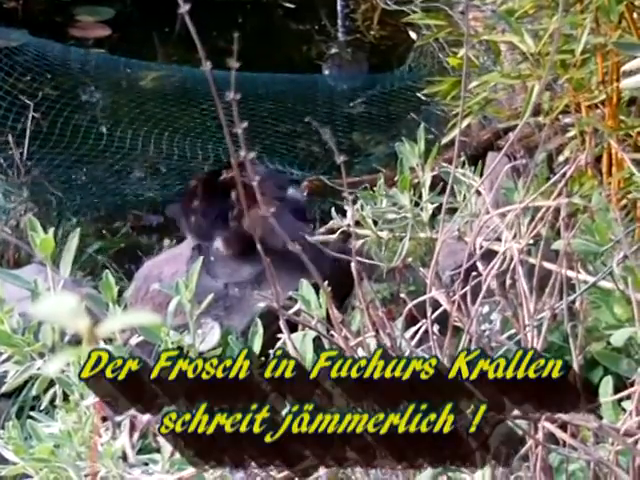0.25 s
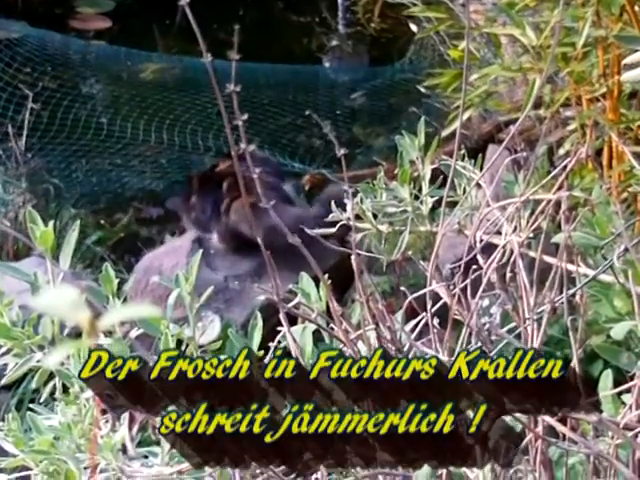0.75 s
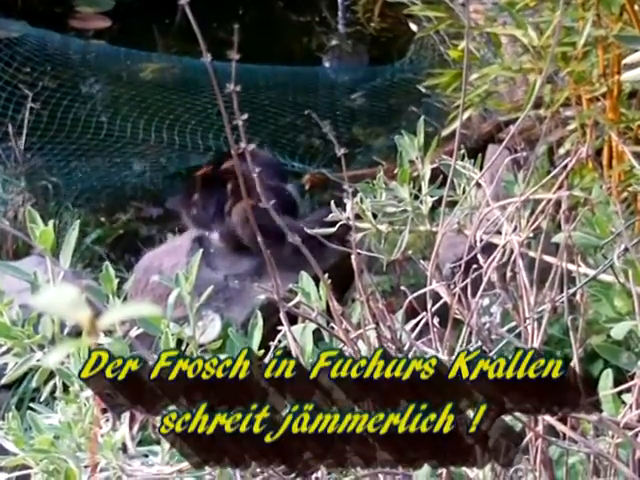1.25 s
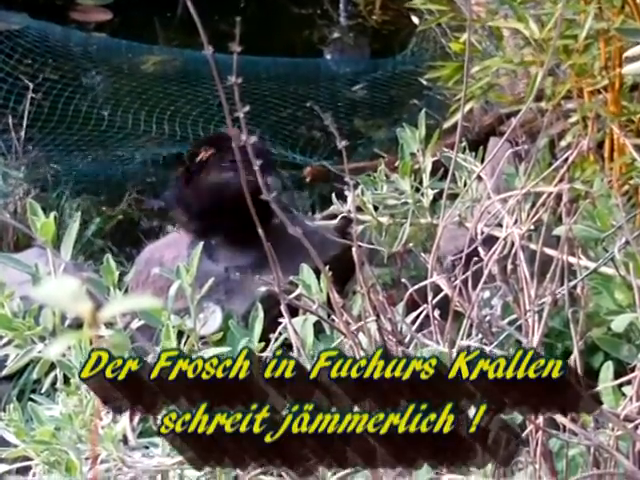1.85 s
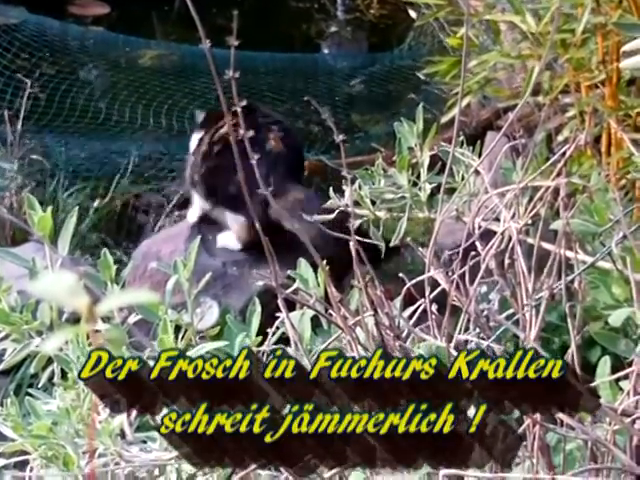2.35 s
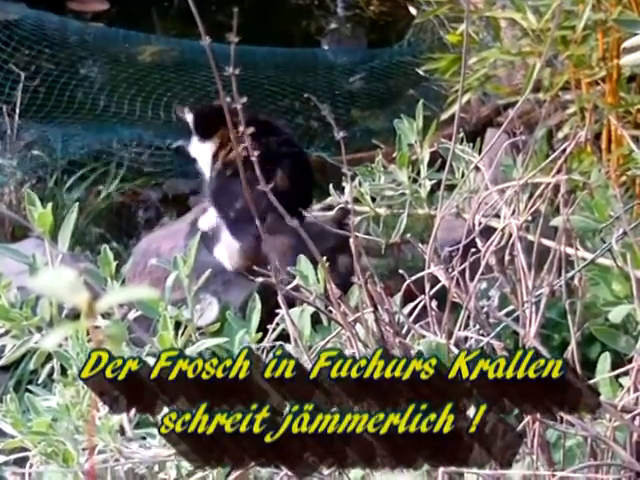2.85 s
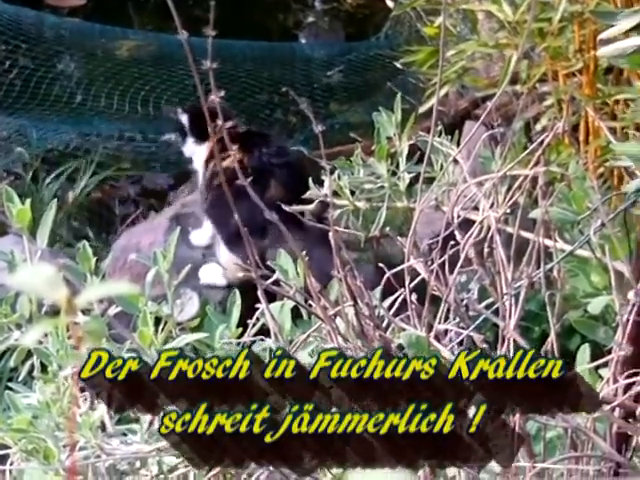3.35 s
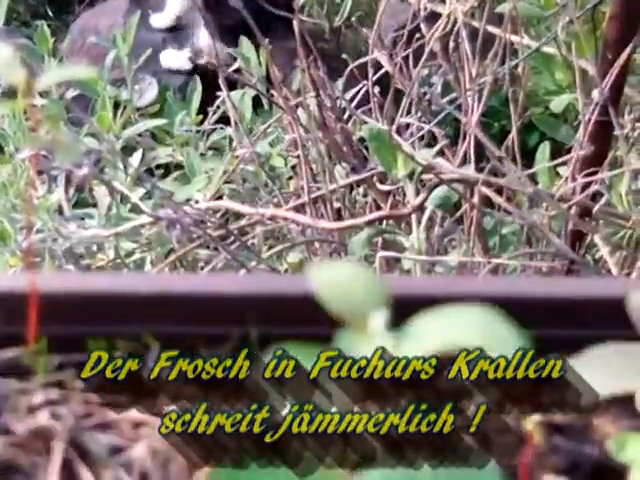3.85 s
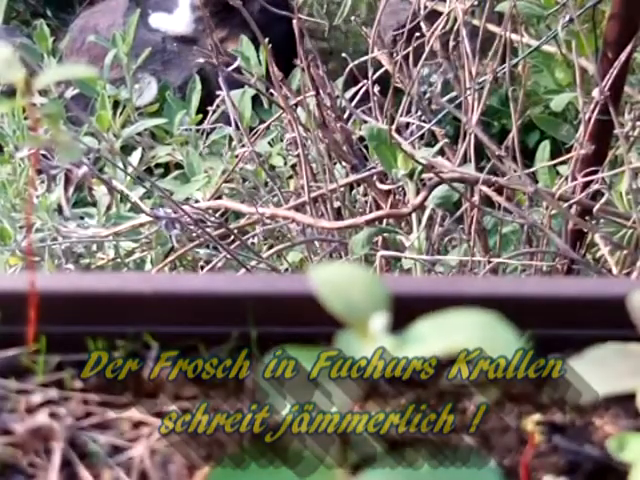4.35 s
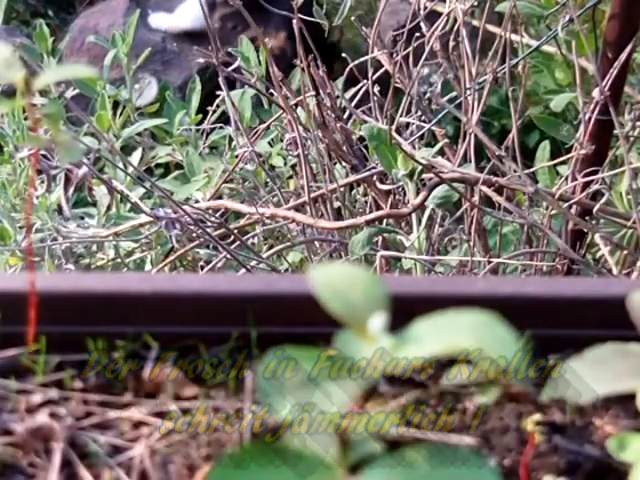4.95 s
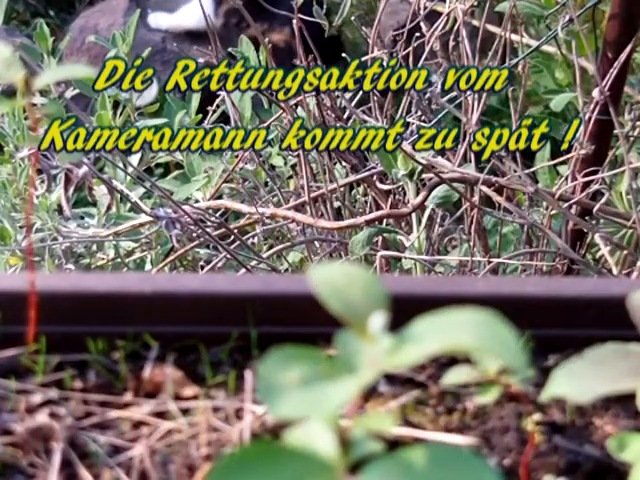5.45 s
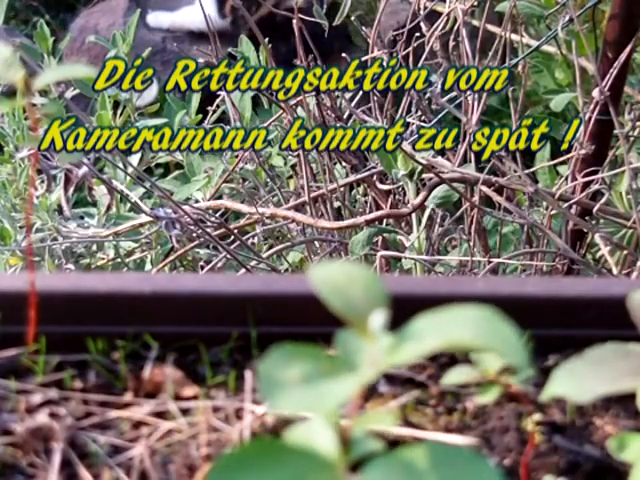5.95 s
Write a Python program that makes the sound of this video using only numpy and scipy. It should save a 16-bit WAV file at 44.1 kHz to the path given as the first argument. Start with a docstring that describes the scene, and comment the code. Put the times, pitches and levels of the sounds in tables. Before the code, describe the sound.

A very quiet garden opens with faint, thin bird chirps and light ticks of dry stems. At about 1.4 seconds the soft outdoor hush and leaf hiss grow louder, and the chirps become clearer. A stalk breaks with a sharp crack at 1.7 seconds, followed by dry rustling. A frog held by a cat screams five times, at about 2.8, 3.5, 4.6, 5.4 and 6 seconds. Each scream is a shrill, slightly raspy wail under half a second long, opening with a high squeak and falling in pitch; the second is weaker. From 3.2 seconds, irregular dull, hollow knocks sound close by, loudest around 5.2 to 5.4 seconds and continuing until the end just after 6 seconds. More twigs snap and leaves rustle between 4 and 6 seconds, with occasional chirps. Faint wind rumbles on the microphone. Screams, chirps and snaps carry a short echo.

```python
"""A quiet garden: dry stalks rustle and snap, and thin chirps, probably a small bird's, come and go.
At about 1.4 seconds the soft outdoor hush grows louder, and a stalk soon breaks with a sharp crack.
From 2.8 seconds a frog held by a cat screams five times: shrill, falling wails from its vocal cords,
whose loudest overtone follows its open mouth. Dull, hollow knocks sound close by after the first scream
and go on to the end. The garden answers the screams, chirps and snaps with a short echo."""
import sys
import numpy as np
from scipy import signal
from scipy.fft import rfft, irfft, next_fast_len
from scipy.io import wavfile
from scipy.ndimage import map_coordinates

SR = 44100
rng = np.random.default_rng(int(sys.argv[2]) if len(sys.argv) > 2 else 0)


def waveform_to_disk(signal):
    """Save audio, clipped to [-1, 1], as 16-bit WAV at the path in sys.argv[1]."""
    frames = np.transpose(np.atleast_2d(signal))
    scaled = np.clip(frames, -1, 1) * 32767
    samples = np.round(scaled).astype(np.int16)
    wavfile.write(sys.argv[1], SR, samples)


N = 273420  # 6.2 seconds
TOP_HZ = 16050  # the highest frequency heard


def amp(db):
    """Turn decibels into a factor to multiply by."""
    return 10 ** (np.asarray(db) / 20)


def unit(x):
    """Scale x to an average (rms) size of 1."""
    return x / np.sqrt(np.mean(x ** 2) + 1e-20)


def along(points, hz):
    """Read between (Hz, value) points on a log frequency axis."""
    freqs, values = np.transpose(points)
    return np.interp(np.log(hz + 1), np.log(freqs + 1), values)


def curves(rows):
    """Give the start time, then each further column as a curve with one value per sample."""
    times, *columns = np.transpose(rows)
    t = np.arange(times[0], times[-1], 1 / SR)
    return [times[0]] + [np.interp(t, times, column) for column in columns]


def wobble(rate, size):
    """A smooth curve through `rate` random values a second."""
    return map_coordinates(rng.standard_normal(int(size * rate / SR) + 4), [np.arange(size) * rate / SR])


def fade(x, seconds):
    """Soften both ends of x."""
    i = np.arange(len(x))
    return x * np.clip(np.minimum(i, i[::-1]) / (seconds * SR), 0, 1)


def add(out, start, x):
    """Mix x into out from `start` seconds on."""
    i = max(round(start * SR), 0)
    out[i:i + len(x)] += x[:max(len(out) - i, 0)]


def filtered(x, response):
    """Scale each frequency f in x by response(f)."""
    size = next_fast_len(len(x) + 8192)
    return irfft(rfft(x, size) * response(np.fft.rfftfreq(size, 1 / SR)), size)[:len(x)]


def resonance(f, hz, width):
    """A filter response that is 1 at hz and weaker on both sides."""
    return 1j * f * width / (hz * hz - f * f + 1j * f * width)


def noise(response, size):
    """Filtered noise with an average size of 1."""
    return unit(filtered(rng.standard_normal(size), response))


def air_level(quiet_db, loud_db, step_at=1.372, step_s=0.008, creep_s=0.45, creep_db=5.5):
    """A background level in dB: it starts quiet, jumps once, then creeps up the last bit."""
    times = step_at + np.array([0, step_s, step_s + creep_s])
    return np.interp(np.arange(N) / SR, times, [quiet_db, loud_db - creep_db, loud_db])


# The tone of the outdoor air. Each row: frequency in Hz, relative level in dB.
HUSH_TONE = [(20, -8), (60, -0.5), (120, -10.5), (185, 0), (240, -2.5), (450, 1.5), (1000, -1.5),
             (1700, -5.5), (3200, -7.5), (5000, -11), (7000, -36), (11000, -90)]

def hush():
    """A low outdoor hush that wavers slightly."""
    air = noise(lambda f: amp(along(HUSH_TONE, f)) * f / (f + 90), N)
    return air * amp(air_level(-64.5, -48) + 0.95 * wobble(15, N))


# Puffs of wind on the microphone. Each row: time of the peak in seconds, relative level in dB.
WIND_PUFFS = [(.56, -63), (2.68, -63), (2.9, -56.5), (3.42, -54), (4.73, -58), (5.32, -61), (6.13, -54.5)]

def wind(gain_db=-2, puff_s=0.084):
    """A faint, deep rumble of wind that swells with each puff."""
    t = np.arange(N) / SR
    breeze = amp(air_level(-83, -66.5))
    puffs = sum(amp(db) * np.exp(-((t - peak) / puff_s) ** 2) for peak, db in WIND_PUFFS)
    return amp(gain_db) * (breeze + puffs) * noise(lambda f: resonance(f, hz=64, width=55), N)


# The tone of the foliage. Each row: frequency in Hz, relative level in dB.
FOLIAGE_TONE = [(1470, -18.5), (2500, -22), (3130, -19), (3830, -3), (7830, -1.5), (12000, -1.5),
                (15200, -2.5), (16000, -26)]

def foliage():
    """Many leaves blend into a soft, high hiss."""
    hiss = noise(lambda f: amp(along(FOLIAGE_TONE, f)), N)
    return hiss * amp(air_level(-65.5, -49) + 0.9 * wobble(15, N))


# The tone of dry leaves and stems. Each row: frequency in Hz, relative level in dB.
DRY_PLANT_TONE = [(410, -10), (700, -4.5), (1020, -7.5), (1350, -0.5), (1540, -4), (1710, -4.5), (2100, -2),
                  (7110, -1.5), (7690, -2.5), (11500, -2.5), (16000, -15)]

def dry_plant_noise():
    """The steady noise that ticks and rustles are shaped from."""
    return noise(lambda f: amp(along(DRY_PLANT_TONE, f)), N)


def stem_ticks(per_second=70, decay_s=0.0011):
    """Dry stems touch at random, each time with a tiny tick."""
    touches = (rng.random(N) < per_second / SR) * rng.random(N)
    bursts = signal.lfilter([1], [1, -np.exp(-1 / (decay_s * SR))], touches)
    return amp(air_level(-75.5, -59)) * unit(bursts * dry_plant_noise())


# Brushes against dry plants. Each row: time of the peak in seconds, level in dB,
# rise time in seconds, fall time in seconds.
BRUSHES = [(.2, -56.5, 0.21, 0.11), (1.33, -54.5, 0.43, 0.12), (1.611, -35.5, 0.037, 0.11),
           (1.662, -28.5, 0.007, .09), (1.778, -37.5, 0.058, 0.29), (2.3, -44, 0.21, 0.2),
           (3.21, -41.5, 0.0071, 0.21), (4.04, -40.5, 0.019, 0.17), (4.149, -34, 0.055, 0.13),
           (4.208, -27, 0.063, 0.095), (5.16, -37, 0.04, 0.027), (5.78, -39.5, .06, 0.09),
           (5.823, -28.5, 0.014, 0.084), (6.19, -36, 0.12, .2)]

def rustle(swell_db=19, clump_db=3):
    """Leaves rub in clumps of crackles; each brush gains swell_db in its rise and loses it in its fall."""
    t = np.arange(N) / SR
    power = sum(amp(db - swell_db * np.maximum((peak - t) / rise, (t - peak) / fall)) ** 2
                for peak, db, rise, fall in BRUSHES)
    crackle = unit(dry_plant_noise() * amp(clump_db * wobble(700, N)))
    return np.sqrt(power) * crackle


# Breaking stalks and twigs. Each row: start in seconds, level in dB, centre frequency in Hz,
# width of the band in Hz, seconds for the splintering to fade by 60 dB.
STALK_BREAKS = [(0.03, -47, 5900, 8000, 0.12), (0.105, -48, 5030, 8000, .12),
                (1.268, -48.5, 7000, 6000, 0.1), (1.604, -29, 9550, 6000, 0.025),
                (1.6609, -8.5, 10400, 5960, 0.0067), (1.66, -23.5, 11000, 6900, 0.22),
                (1.771, -34, 8000, 8000, 0.018), (2.523, -31, 8160, 9000, 0.091),
                (3.203, -25.5, 8900, 8000, 0.052), (3.332, -38, 6000, 12000, .02),
                (3.477, -32.5, 1500, 400, .025), (3.9913, -18.5, 3660, 2480, 0.017),
                (3.9941, -14, 2790, 1190, 0.018), (4.087, -26.5, 1340, 900, 0.025),
                (4.613, -19, 4370, 7100, 0.011), (4.743, -17, 2200, 1013, 0.015),
                (4.917, -27, 1880, 900, 0.009), (5.136, -30, 1590, 1200, 0.017)]

def snaps(crack_db=3):
    """A breaking stalk gives one sharp crack and a short splintering around the same frequency."""
    out, t = np.zeros(N), np.arange(SR // 4) / SR
    for start, db, hz, width, fade_s in STALK_BREAKS:
        crack = amp(crack_db) * np.sin(2 * np.pi * hz * t) * np.exp(-width * t)
        splinters = amp(-60 * t / fade_s) * noise(lambda f: resonance(f, hz, width), len(t))
        add(out, start, amp(db) * (crack + splinters))
    # thin stalks give off no bass
    return signal.sosfilt(signal.butter(2, 800, "high", fs=SR, output="sos"), out)


# The notes at which the knocked thing rings. Each row: frequency in Hz, width in Hz, relative level in dB.
HOLLOW_NOTES = [(167, 12, 5.5), (313, 28, 4), (414, 43, 5), (520, 41, -16), (760, 52, -1), (1000, 51, 0)]

def hollow_body(f, blow_hz, ring_db=-3, dull_hz=1350):
    """A hollow body favours its own notes and those near the blow's pitch, and muffles the treble."""
    ringing = sum(amp(db) * np.abs(resonance(f, hz, width)) for hz, width, db in HOLLOW_NOTES)
    near_blow = np.abs(resonance(f, 1.06 * blow_hz, 1.87 * blow_hz))
    return (1 + amp(ring_db) * ringing) * near_blow / np.sqrt(1 + (f / dull_hz) ** 6)


# Dull knocks close by. Each row: start in seconds, level of the blow in dB, pitch in Hz,
# relative level of the rattle after it in dB.
BLOWS = [(3.24, -32.5, 450, -48.5), (4.036, -41, 730, -42), (4.209, -28.5, 410, -53),
         (4.555, -21.5, 650, -39.5), (4.583, -23, 600, -42), (4.852, -18.5, 615, -36),
         (5.2014, -12.5, 1000, -31.5), (5.2372, -12, 554, -27.5), (5.4, -10, 960, -24.5),
         (5.637, -25.5, 1000, -31), (5.675, -25.5, 428, -52), (5.756, -19.5, 530, -33),
         (5.8146, -18.5, 1270, -28.5), (6.087, -22, 1150, -33.5), (6.122, -34, 550, -32),
         (6.144, -23, 710, -38.5)]

def knocks(click_db=-19, grit_db=-13, bounce_db=2.5, rattle_gain_db=-0.5, hold_s=0.026, fade_s=0.24):
    """Each blow clicks and swings for a cycle or two; the hollow body rattles briefly, then dies away."""
    out, t = np.zeros(N), np.arange(SR // 3) / SR
    grit = lambda f: resonance(f, hz=2700, width=1800)
    for start, db, hz, rattle_db in BLOWS:
        cycles = hz * t
        swing = np.sin(2 * np.pi * cycles) * cycles ** 0.51 * np.exp(-1.6 * cycles / 0.97)
        click = amp(click_db) * noise(grit, len(t)) * np.exp(-t / 0.0045)
        blow = swing / np.abs(swing).max() + click
        rattle = noise(lambda f: hollow_body(f, hz), len(t)) + amp(grit_db) * noise(grit, len(t))
        bounces = unit(rattle * amp(bounce_db * wobble(140, len(t)))) * np.std(rattle)
        envelope = amp(-60 * np.maximum(t - hold_s, 0) / fade_s) * (1 - np.exp(-t / 0.00016))
        add(out, start, amp(db) * blow + amp(rattle_db + rattle_gain_db) * bounces * envelope)
    # a small body gives off no deep bass
    return signal.sosfilt(signal.butter(3, 175, "high", fs=SR, output="sos"), out)


# The bird's chirps. Each row: start in seconds, length in seconds, first, middle and last pitch in Hz,
# level in dB, depth of the trill as a fraction of the pitch.
BIRD_CHIRPS = [ (0.37, 0.054, 5500, 4330, 4040, -57, 0.05), (0.418, 0.076, 3900, 4190, 4400, -60.5, 0),
               (0.412, .07, 7750, 8200, 8860, -61, 0.01), (0.529, 0.037, 3140, 2970, 2700, -55.5, 0.05),
               (.532, .03, 4000, 4400, 4860, -59, .05), (0.564, 0.064, 3720, 3470, 3350, -63.5, .1),
               (.689, 0.023, 3250, 3400, 3420, -56.5, .1), (0.721, 0.057, 2100, 2210, 2180, -63, 0.02),
               (0.908, .048, 4820, 4230, 4700, -62.5, 0.02), (0.951, 0.083, 4980, 5740, 5850, -57.5, 0.02),
               (1.034, 0.066, 5700, 4670, 3770, -57, 0.1), (1.241, 0.035, 3980, 4340, 4520, -58, .1),
               (1.383, 0.047, 2860, 3160, 3350, -38, 0.04), (1.431, 0.085, 3465, 3420, 3410, -40, 0.03),
               (1.557, 0.033, 4460, 3310, 2790, -39, 0), (1.627, .058, 2380, 2590, 2540, -40.5, 0.01),
               (1.727, 0.051, 4440, 4460, 3930, -34.5, 0.02), (1.78, 0.048, 3080, 2880, 2900, -48, 0),
               (1.914, 0.096, 3130, 3130, 3990, -39, 0.03), (2.001, 0.034, 4330, 4410, 4230, -32, 0.03),
               (2.113, 0.091, 3960, 3984, 3460, -34, 0.01), (2.328, 0.066, 2600, 2154, 1960, -43, 0.03),
               (2.414, 0.085, 2024, 2174, 2280, -49, 0), (2.608, 0.14, 3040, 2754, 2743, -41.5, 0),
               (4.217, 0.045, 2905, 2154, 1690, -35, 0.01), (4.43, 0.036, 4100, 4420, 4730, -44.5, 0.05),
               (4.456, 0.07, 3650, 3610, 3610, -47.5, 0.08), (5.992, 0.021, 3370, 3400, 3410, -33.5, 0.03)]

def bird(octave_db=-26, trill_hz=44, waver=0.005, flutter_db=1.3, attack_s=0.009, release_s=0.01):
    """Thin whistles with a weak octave: each glides along one arc, most with a fast, uneven trill."""
    out = np.zeros(N)
    for start, length, first_hz, middle_hz, last_hz, db, depth in BIRD_CHIRPS:
        t = np.arange(0, length, 1 / SR)
        n = len(t)
        arc = np.polyval(np.polyfit([0, .5, 1], [first_hz, middle_hz, last_hz], 2), t / length)
        trill = np.sin(2 * np.pi * trill_hz * t) + .5 * wobble(600, n)
        pitch = arc * (1 + depth * trill + waver * wobble(188, n))
        phase = 2 * np.pi * np.cumsum(pitch) / SR
        envelope = np.minimum(t / attack_s, 1) * np.minimum((length - t) / release_s, 1)
        whistle = unit(np.sin(phase) + amp(octave_db) * np.sin(2 * phase))
        add(out, start, amp(db + flutter_db * wobble(94, n)) * envelope * whistle)
    return out


# How the frog's throat colours its voice. Each row: frequency in Hz, boost or cut in dB.
THROAT_TONE = [(900, -8.5), (1450, -12), (1900, 5), (2500, -1), (3300, -1.5), (4200, 1), (6300, 1.5),
               (8100, -4), (9800, -5), (11500, -8.5), (13000, -8), (16000, -12)]

def throat_and_mouth(hz, mouth_hz, gape, mouth_db=19, upper_gap_hz=8300):
    """The strength of each overtone: the throat colours it and two resonances of the mouth lift it."""
    lift = lambda db, centre, width: 1 + amp(db) / (1 + (2 * (hz - centre) / width) ** 2)
    lower = lift(mouth_db, mouth_hz, width=800)
    upper = lift(2.5 - 8.5 * gape, mouth_hz + upper_gap_hz, width=1300)  # a wider mouth weakens it
    return amp(along(THROAT_TONE, hz)) * lower * upper * (hz < TOP_HZ)


def scream(rows, shrill_db, usual_db=-22, jitter=0.0051, scatter_radians=0.036, treble_hz=7200,
           flutter_db=2, flare_db=2, rasp_db=-23, hiss_db=-5.5, release_s=0.007):
    """The vocal cords give a stack of overtones; the mouth lifts whichever lies nearest its resonance."""
    start, pitch, mouth_hz, level_db = curves(rows)
    n = len(pitch)
    gape = (mouth_hz - 4500) / 1000  # kHz above the usual resonance: more means a wider mouth
    # more effort and a wider mouth let out more treble
    treble_db = -36 + shrill_db + 0.31 * (level_db - usual_db) + 4.5 * gape
    # the high squeak that opens a scream cracks in pitch and level
    squeak = np.clip((pitch - 1800) / 500, 0, 1)
    pitch = pitch * (1 + jitter * wobble(350, n) + .028 * squeak * wobble(260, n))
    level_db = level_db + squeak * (4.5 * wobble(200, n) - 3)
    phase = 2 * np.pi * np.cumsum(pitch) / SR
    harmonics = np.arange(1, 16)[:, None]
    hz = harmonics * pitch
    strength = throat_and_mouth(hz, mouth_hz, gape)
    strength *= amp(-9 * squeak * np.clip((hz - mouth_hz) / 1500, 0, 1))  # the squeak is thin on top
    # cords that close harder brighten the highest overtones; the squeak stays purer
    high = np.clip((hz - treble_hz) / 800 + .5, 0, 1)
    brightness = amp(treble_db - level_db - 6.6 * squeak) * np.minimum(1900 / pitch, 1) ** 2
    unit_power = lambda band: band / np.sqrt(np.sum(band ** 2, axis=0) / 2 + 1e-12)
    strength = unit_power(strength * (1 - high)) + brightness * unit_power(strength * high)
    # each overtone flickers fast and flares slowly as the frog struggles, the high ones most
    flutter = amp([flutter_db * wobble(119.1, n) + (flare_db + 0.5 * h) * wobble(21.1, n) for h in high])
    # cords that close unevenly blur the higher overtones most
    blur = scatter_radians * harmonics * np.array([wobble(900, n) for _ in harmonics])
    overtones = np.sin(harmonics * phase + blur + rng.uniform(0, 2 * np.pi, harmonics.shape))
    voice = np.sum(strength * flutter * overtones, axis=0)
    # swirling breath roughens every overtone and adds a little hiss
    rasp = amp(rasp_db) * voice * noise(lambda f: 1 / (1 + (f / 700) ** 2), n)
    hiss = amp(treble_db - level_db + hiss_db) * noise(lambda f: resonance(f, hz=5100, width=8800), n)
    release = 1 - np.exp(-np.arange(n)[::-1] / SR / release_s)  # the air runs out
    return start, fade(amp(level_db) * release * (voice + rasp + hiss), seconds=0.0011)


# The course of each scream, one list of rows per scream. Each row: time in seconds, pitch in Hz,
# resonance of the mouth in Hz, relative level in dB.
SCREAM_SHAPES = [
    [(2.77, 1915, 2640, -36), (2.79, 1933, 3320, -43), (2.806, 1835, 3360, -31), (2.824, 1773, 3560, -16),
     (2.84, 1650, 4200, -27.5), (2.854, 1577, 4700, -14), (2.872, 1359, 4500, -23.5),
     (2.9, 1317, 4770, -23.5), (2.924, 1262, 4930, -20.5), (2.964, 1268, 4930, -21.5),
     (2.99, 1399, 4700, -24), (3.042, 1388, 4540, -25), (3.085, 1412, 4210, -32)],
    [(3.54, 3188, 2560, -42), (3.576, 2314, 3300, -37.5), (3.6, 2097, 3840, -31.5),
     (3.628, 1920, 3400, -32.5), (3.634, 1649, 3250, -28.5), (3.682, 1573, 3400, -26.5),
     (3.744, 1400, 3280, -34), (3.758, 1300, 3050, -39.5), (3.784, 926, 2220, -35.5),
     (3.81, 960, 1980, -44)],
    [(4.645, 2723, 4860, -34), (4.657, 2096, 5000, -32), (4.681, 1695, 5500, -25),
     (4.711, 1460, 5770, -14.5), (4.777, 1278, 5910, -21), (4.817, 1257, 6180, -18),
     (4.863, 1237, 5100, -23.5), (4.885, 1206, 4800, -16.5), (4.915, 1151, 4680, -20.5),
     (4.955, 1140, 4300, -26), (4.975, 1090, 4370, -28), (5.007, 1079, 3500, -24.5),
     (5.059, 906, 2760, -26.5), (5.08, 928, 2800, -27)],
    [(5.44, 2586, 4360, -32), (5.476, 1673, 4080, -36), (5.492, 1727, 4150, -37),
     (5.498, 1502, 4450, -19.5), (5.51, 1420, 4180, -15.5), (5.53, 1305, 4370, -24.5),
     (5.56, 1222, 4400, -25), (5.582, 1243, 3860, -25), (5.632, 1220, 3460, -19), (5.665, 1233, 3680, -27)],
    [(6.01, 2646, 5220, -33), (6.026, 2130, 5260, -40), (6.036, 1796, 5450, -28), (6.044, 1770, 5500, -35),
     (6.05, 1520, 5420, -28), (6.094, 1382, 5460, -17), (6.128, 1335, 5530, -18.5),
     (6.194, 1244, 5800, -22.5)],
]
# How shrill the screams are. One number per scream: extra treble in dB.
EXTRA_TREBLE_DB = [2, 6.5, -0.5, -1, -3]

def frog(gain_db=-0.56):
    """The frog screams five times, each wail falling in pitch."""
    out = np.zeros(N)
    for rows, shrill_db in zip(SCREAM_SHAPES, EXTRA_TREBLE_DB):
        add(out, *scream(rows, shrill_db))
    return amp(gain_db) * out


# How long the garden echoes. Each row: frequency in Hz, seconds to fade by 60 dB.
ECHO_TIMES = [(300, .27), (3500, .28), (7000, .27), (14000, .2)]

def garden_echo(x, delay_s=0.006):
    """Stones, fence and plants scatter a short echo; the treble dies first."""
    hz, t, spectrum = signal.stft(rng.standard_normal(SR // 2), SR, nperseg=256)
    decay = amp(-60 * t / along(ECHO_TIMES, hz)[:, None])
    tail = signal.istft(spectrum * decay, SR, nperseg=256)[1]
    tail = np.pad(tail / np.linalg.norm(tail), (round(delay_s * SR), 0))
    return signal.fftconvolve(x, tail)[:N]


def scene(frog_echo_db=-9, bird_echo_db=-7, snap_echo_db=-14):
    """Mix everything into one channel; only the frog, the bird and the snaps echo."""
    cries, chirps, twigs = frog(), bird(), snaps()
    echo = garden_echo(amp(frog_echo_db) * cries + amp(bird_echo_db) * chirps + amp(snap_echo_db) * twigs)
    nearby = knocks() + rustle()
    background = hush() + foliage() + stem_ticks() + wind()
    return (background + nearby + twigs + chirps + cries + echo)[None]


def record(dry):
    """Cut away everything above TOP_HZ."""
    return np.array([filtered(x, lambda f: f < TOP_HZ) for x in dry])


dry = scene()
out = record(dry)
waveform_to_disk(out)
```